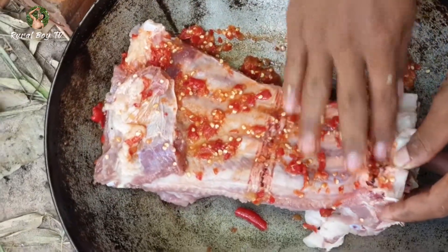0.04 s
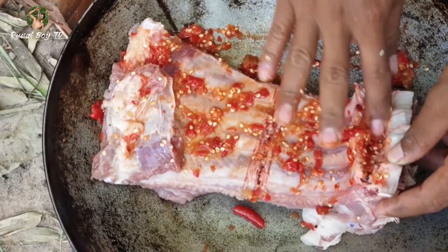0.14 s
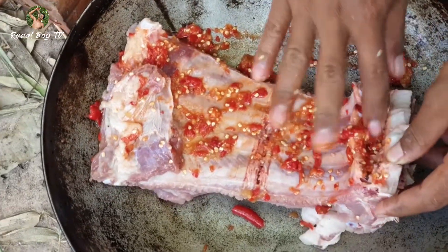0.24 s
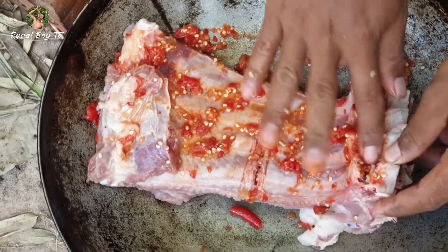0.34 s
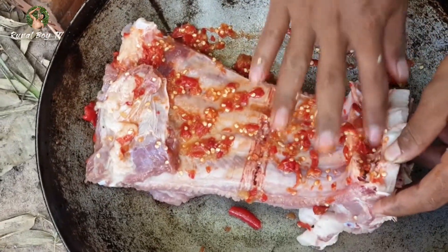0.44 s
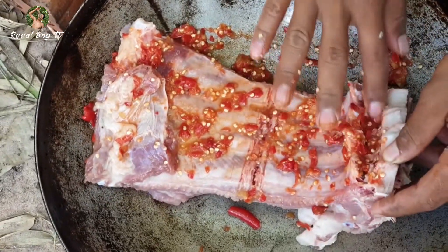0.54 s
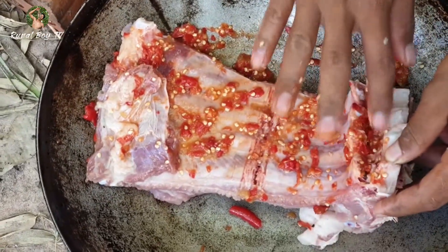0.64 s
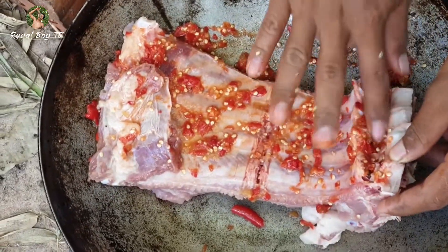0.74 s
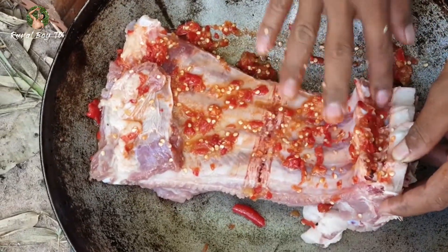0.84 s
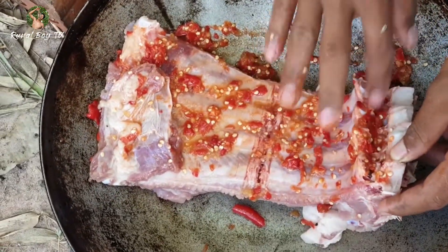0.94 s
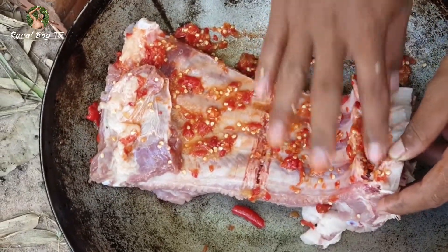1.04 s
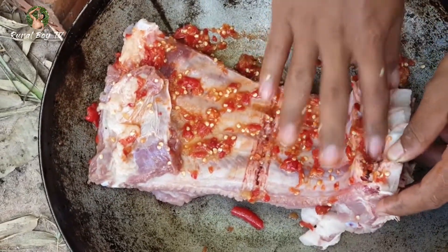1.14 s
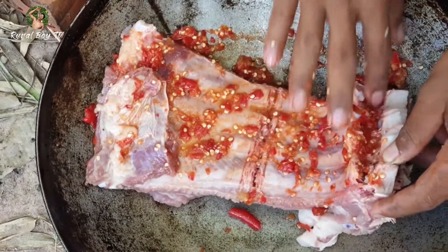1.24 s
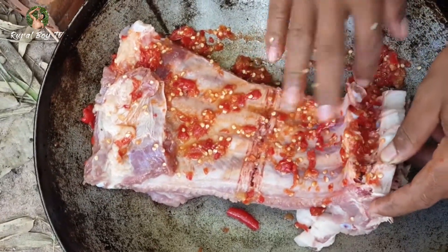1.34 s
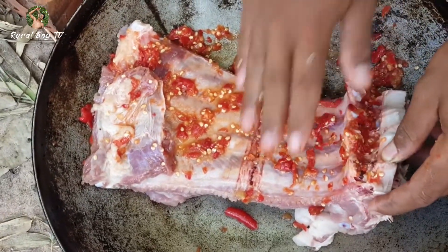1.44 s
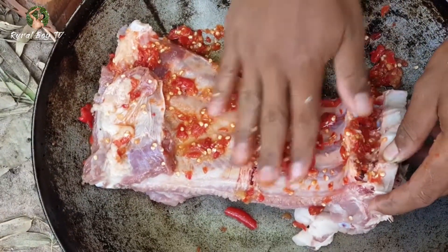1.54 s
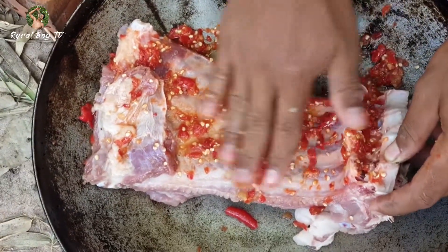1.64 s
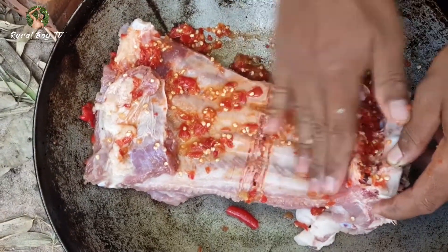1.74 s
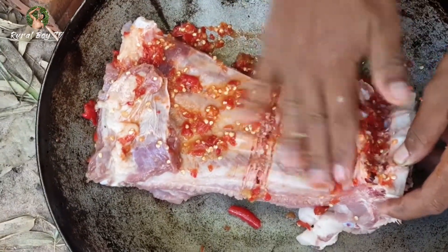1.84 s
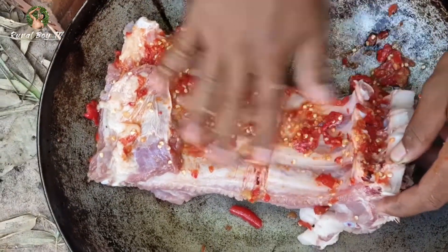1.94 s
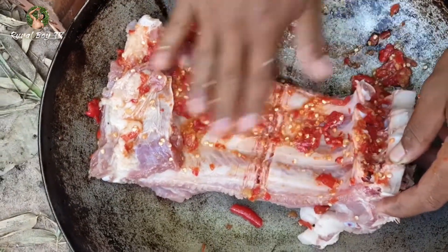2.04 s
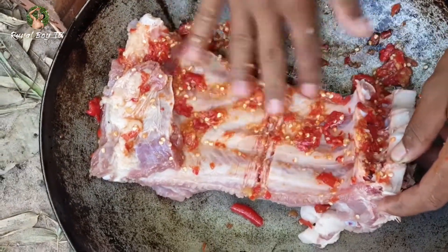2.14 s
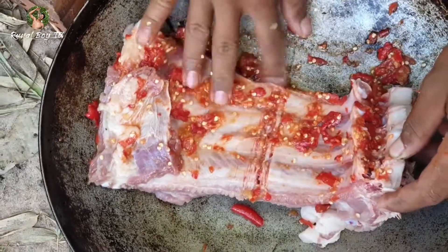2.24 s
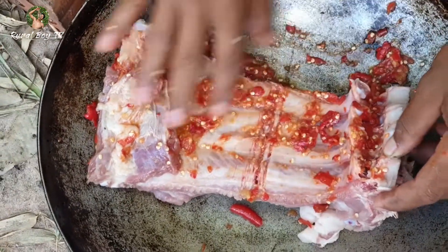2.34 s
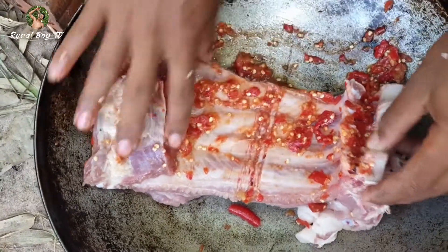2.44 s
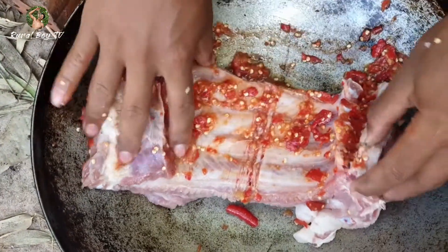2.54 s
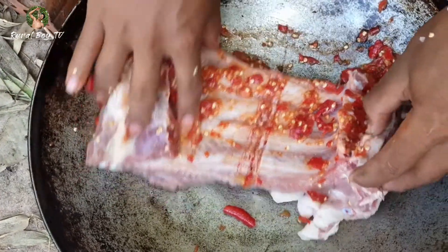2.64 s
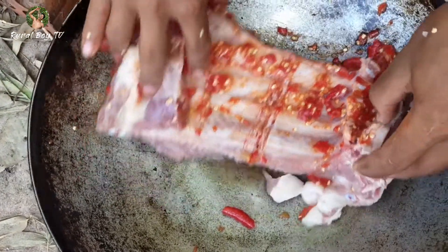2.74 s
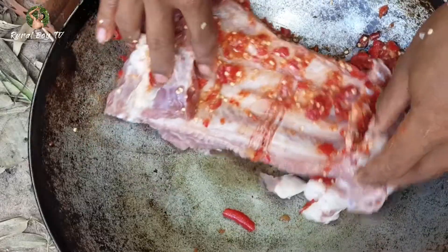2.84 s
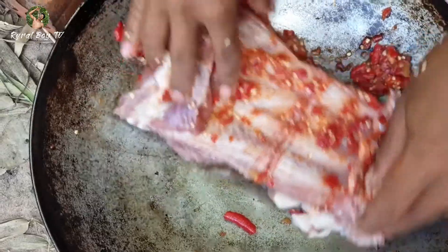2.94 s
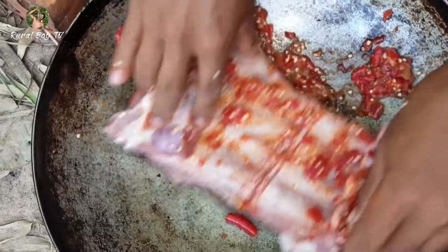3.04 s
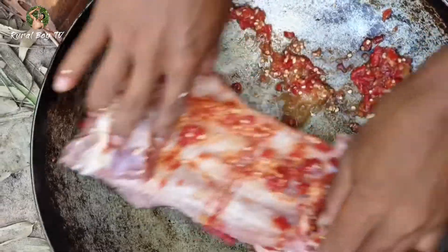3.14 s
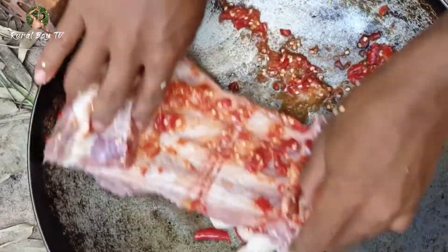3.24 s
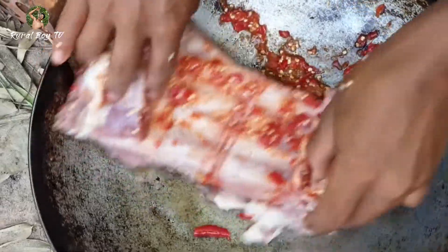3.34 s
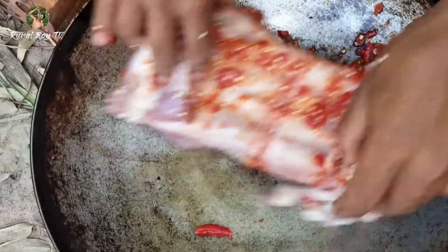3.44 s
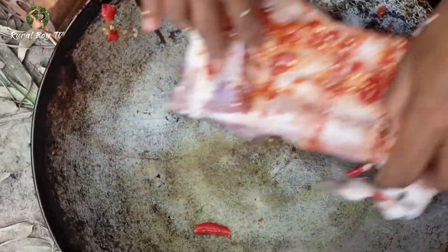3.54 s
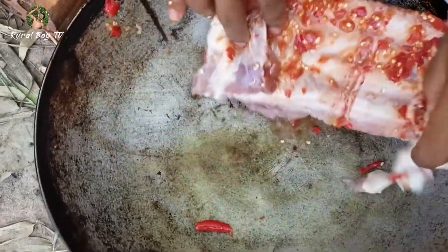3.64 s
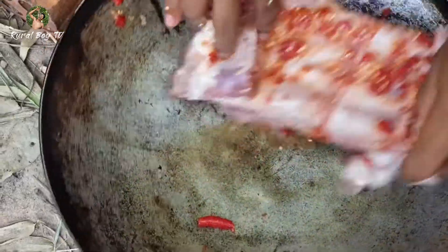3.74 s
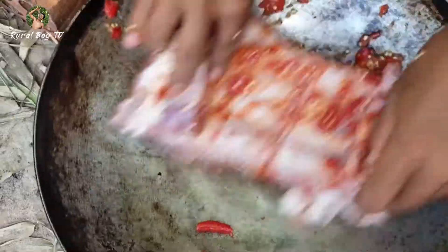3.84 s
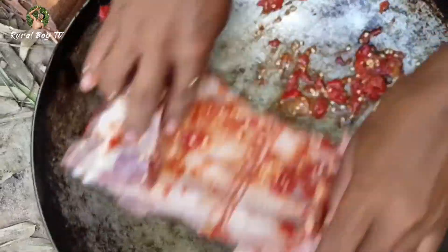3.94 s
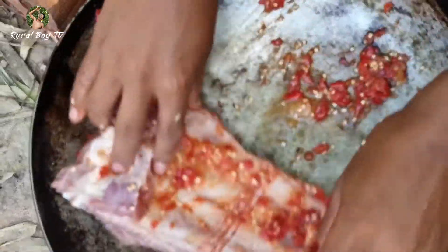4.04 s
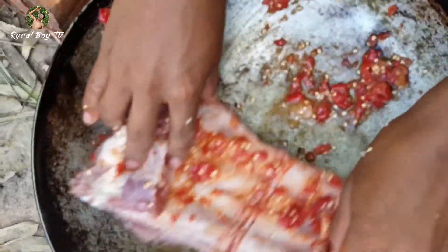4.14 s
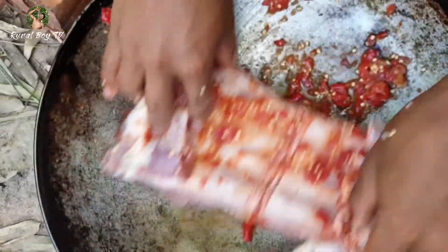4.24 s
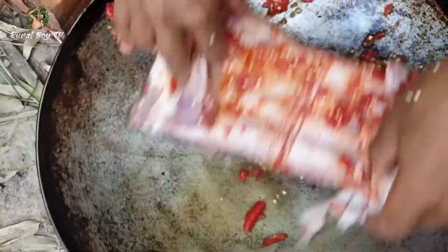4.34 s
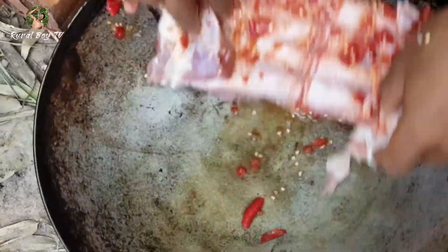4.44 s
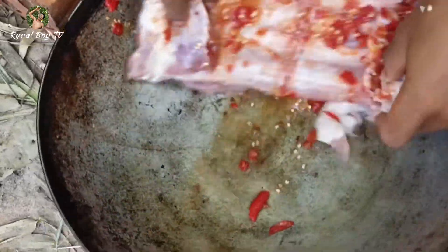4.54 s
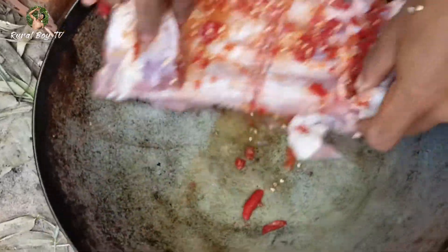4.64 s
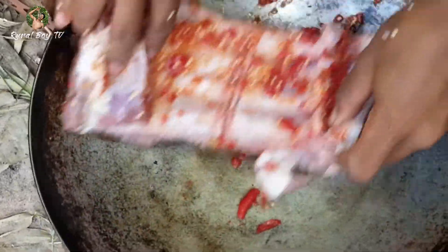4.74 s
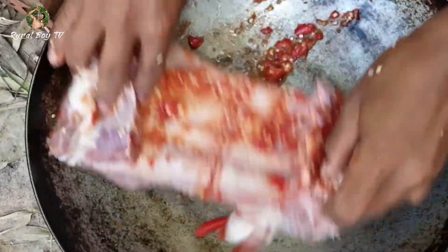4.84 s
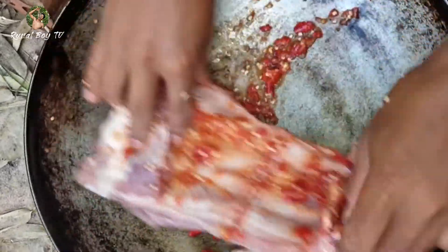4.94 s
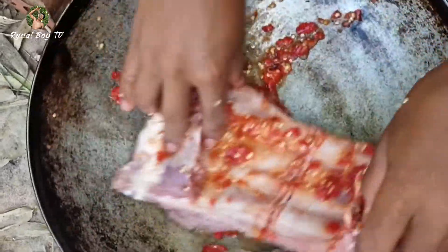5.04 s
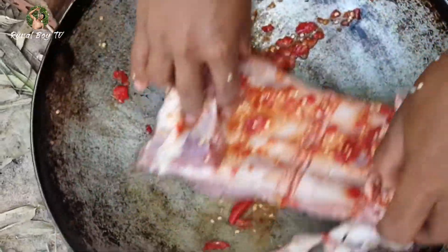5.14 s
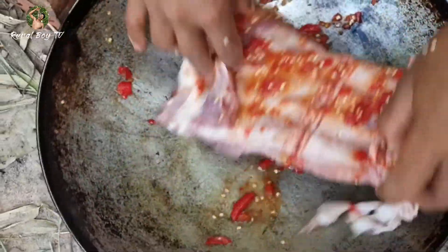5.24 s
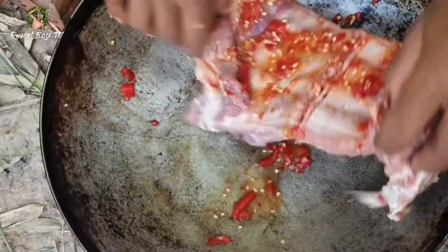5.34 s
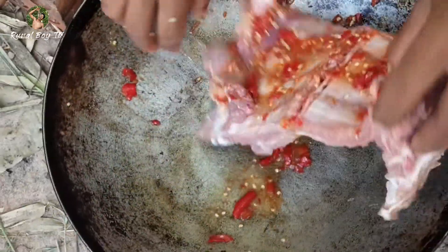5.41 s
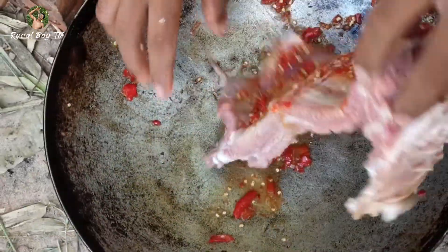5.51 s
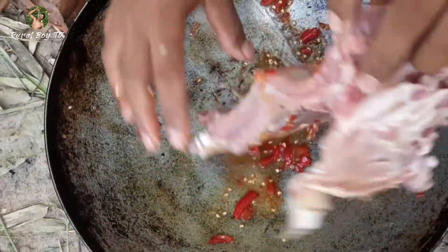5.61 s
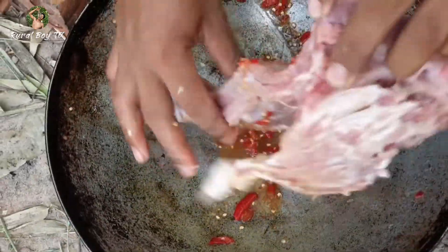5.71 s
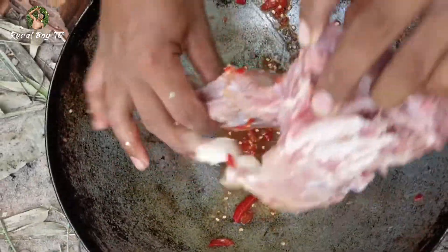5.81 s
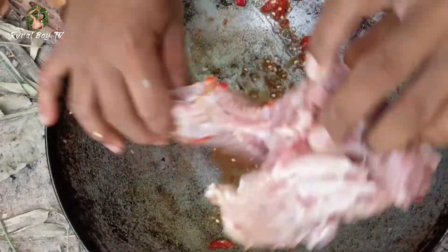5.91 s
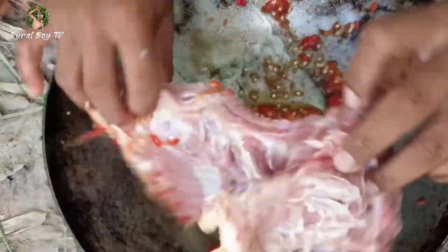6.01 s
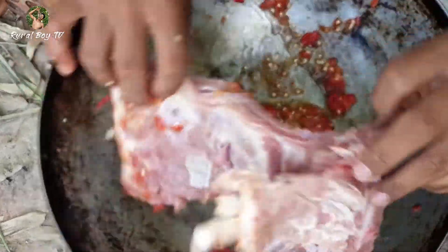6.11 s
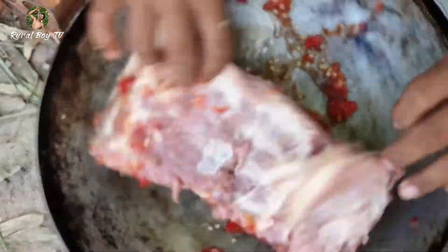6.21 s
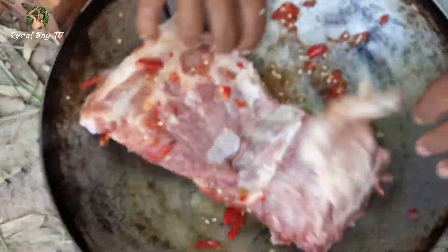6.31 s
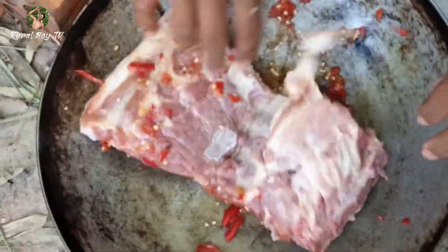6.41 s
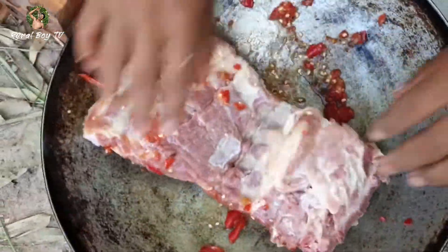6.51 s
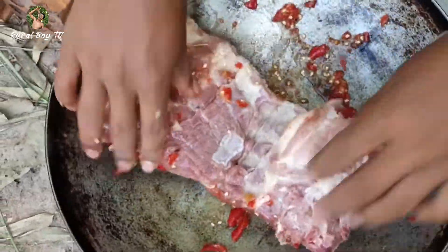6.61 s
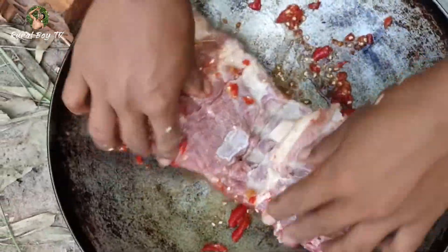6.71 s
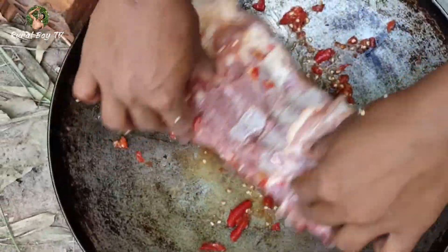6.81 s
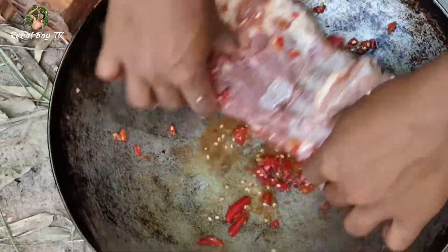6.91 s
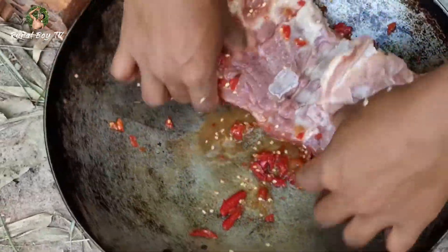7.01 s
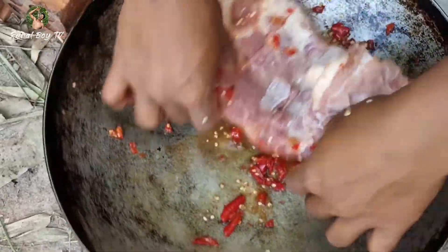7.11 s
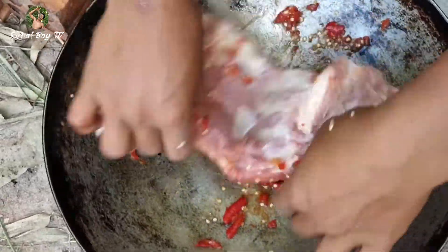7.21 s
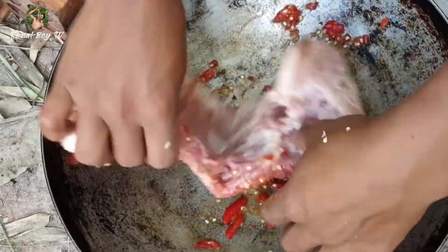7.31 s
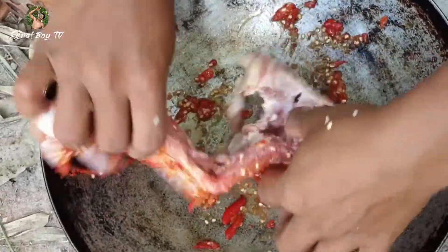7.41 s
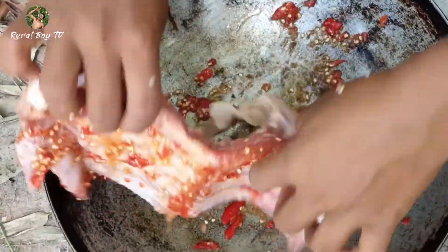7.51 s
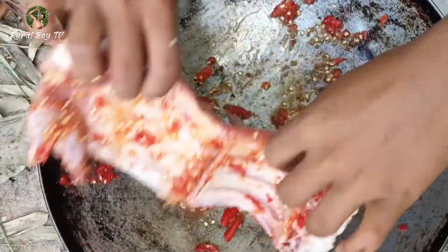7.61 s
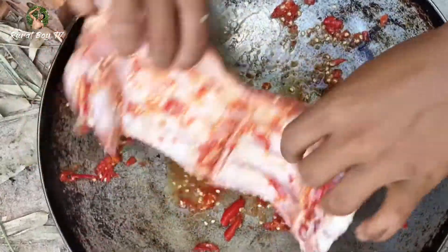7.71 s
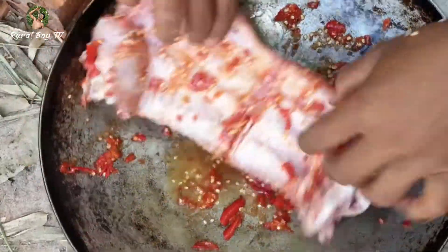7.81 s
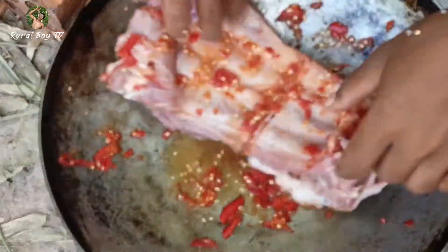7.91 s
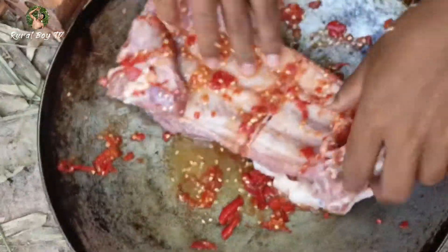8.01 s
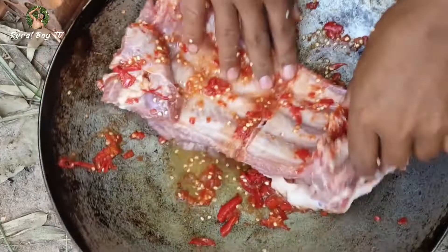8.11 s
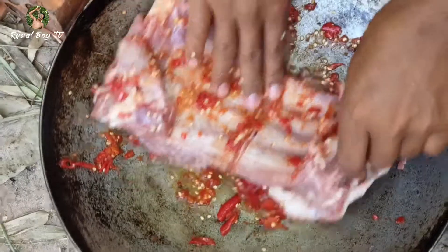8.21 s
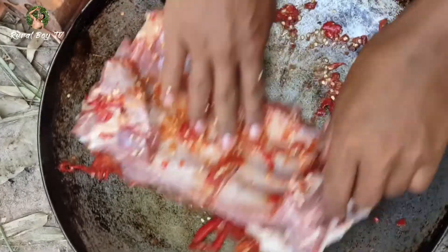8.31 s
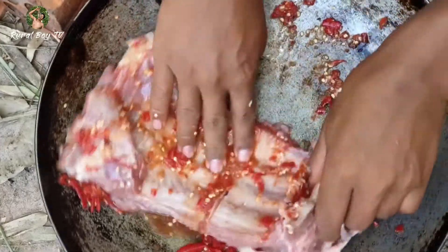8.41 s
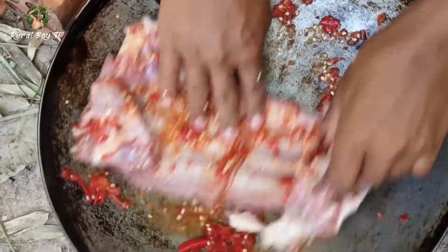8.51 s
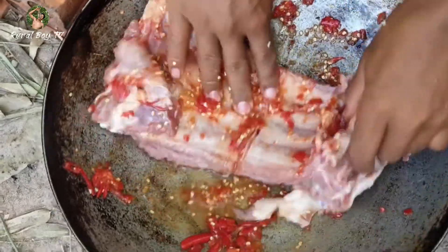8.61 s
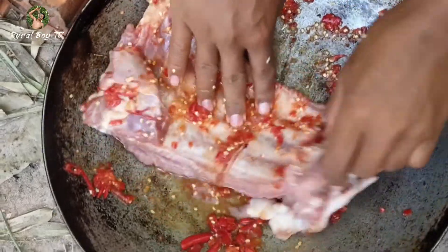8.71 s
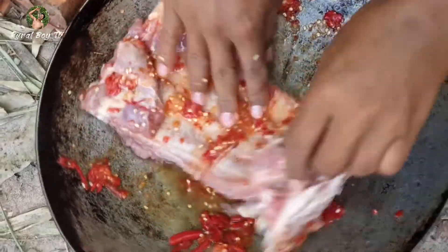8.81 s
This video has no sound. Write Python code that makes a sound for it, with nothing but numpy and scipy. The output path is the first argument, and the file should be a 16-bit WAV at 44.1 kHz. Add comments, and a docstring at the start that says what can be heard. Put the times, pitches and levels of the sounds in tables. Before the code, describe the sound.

A near stereo microphone catches quiet, sticky finger rubbing on raw ribs, then longer hissing wipes against a metal pan, with dull damped knocks. A small bird's quick up-and-down whistle recurs through the first half and leaves a short, airy echo. The rubbing nearly stops, then the meat lands in a cluster of hard knocks, a low thud and wet smacks, and grating slides continue over soft outdoor rumble.

```python
"""Hands rub wet marinade into a slab of raw ribs outdoors, then wipe the slab round a metal pan and turn it over.
The wet film is many tiny ringing grains and noise that crackle and hiss; skin parts in short bursts of spray.
Short gliding bands of noise colour the rubbing, and bone ends are damped knocks that ring the pan.
A bird repeats one arched whistle over a low, uneven rumble and faint far air, both of filtered noise."""
import sys
import numpy as np
from scipy import signal
from scipy.fft import rfft, irfft, next_fast_len
from scipy.io import wavfile
from scipy.ndimage import map_coordinates

SR = 44100
rng = np.random.default_rng(int(sys.argv[2]) if len(sys.argv) > 2 else 0)


def int16_out(signal):
    """Quantize to a 16-bit WAV file."""
    q = np.round(np.clip(np.atleast_2d(signal).T, -1, 1) * 32767)
    wavfile.write(sys.argv[1], SR, q.astype(np.int16))


N = 390726
TIME = np.arange(N) / SR

# How alike left and right are in the sounds at the pan and in the rumble.
# Each row: frequency in Hz, likeness (1 is the same, 0 is unrelated).
LIKENESS = [(60, 0.79), (130, 0.94), (290, 0.57), (640, 0.83), (1410, 0.79), (3100, 0), (15000, 0)]
# Fingers stroking the slab. Each row: moment of full speed in seconds, rise and fall in seconds, hiss level in dB.
FINGER_RUBS = [(0.0, 0.012, -52.5), (.1, .04, -59), (0.271, 0.024, -56.5), (.49, 0.052, -51),
               (.6, 0.14, -67), (.72, 0.15, -55.5), (.88, 0.082, -56), (1.02, 0.068, -64),
               (1.229, 0.098, -56), (1.61, 0.017, -50.5), (1.75, 0.033, -51.5), (1.94, 0.079, -52),
               (2.13, .06, -58.5), (2.28, 0.059, -52.5), (2.528, 0.035, -46.5)]


def gain_of(db):
    """Decibels to amplitude."""
    return 10 ** (np.asarray(db) / 20)


def evened(x):
    """Scales to rms 1."""
    return x / np.sqrt(np.mean(x ** 2) + 1e-20)


def read(points, hz):
    """Reads a curve of (Hz, value) points on a log-frequency axis."""
    f, value = np.transpose(points)
    return np.interp(np.log(hz + 1), np.log(f + 1), value)


def add(mix, s, sound):
    """Adds a sound to both channels at time s."""
    part = mix[:, max(round(s * SR), 0):][:, :sound.shape[-1]]
    part += sound[..., :part.shape[1]]


def coloured(x, spectrum, likeness):
    """Gives two unrelated channels a spectrum and a left-right likeness, at rms 1."""
    size = next_fast_len(N)
    hz = np.fft.rfftfreq(size, 1 / SR)
    left, other = rfft(x, size)
    same = np.clip(read(likeness, hz), -1, 1)
    right = same * left + np.sqrt(1 - same ** 2) * other
    shaped = np.array([left, right]) * gain_of(read(spectrum, hz))
    return evened(irfft(shaped, size)[:, :N])


def waver(rate_hz):
    """Random drift in straight lines between chance values, at rms 1."""
    knots = np.arange(0, N / SR + 1, 1 / rate_hz)
    return evened(np.interp(TIME, knots, rng.standard_normal(len(knots))))


def grains(per_s, spread_db, low_hz, high_hz, cycles, count=24):
    """Tiny bursting films: each size rings with its own decay and reaches the two microphones with its own phase."""
    t, out = np.arange(600) / SR, np.zeros((2, N))
    for hz in np.geomspace(low_hz, high_hz, count):
        strength = gain_of(spread_db * np.minimum(rng.exponential(1, N), 4))
        clicks = (rng.random(N) < per_s / count / SR) * strength
        phase = rng.random((2, 1))  # in turns
        ring = np.exp(-t * hz / cycles) * np.sin(2 * np.pi * (hz * t + phase))
        out += signal.oaconvolve(clicks[None], ring * hz, axes=1)[:, :N]
    return evened(out)


def pan_ring(x):
    """The damped pan's answer to a push: each mode has its listed gain at resonance."""
    # Modes of the pan. Each row: frequency in Hz, gain in dB, time to fall by 60 dB in seconds.
    modes = [(399, 4, 0.079), (561, 9, 0.064), (840, -21, 0.16), (1168, 0, 0.056), (1420, -0.5, 0.047),
             (1872, 12, 0.037), (2247, 12.5, 0.077), (2660, 15, 0.016)]
    t = np.arange(SR // 5) / SR
    ring = np.zeros(len(t))
    for hz, db, t60 in modes:
        unit_gain = 2 * np.log(1000) / (t60 * SR)
        ring += gain_of(db - 60 * t / t60) * np.cos(2 * np.pi * hz * t) * unit_gain
    return signal.oaconvolve(x, ring[None], axes=1)[:, :N]


def echoes(x, t60, delay):
    """Sparse scattered returns that die away, different at each microphone."""
    t = np.arange(SR // 2) / SR
    hits = (rng.random((2, len(t))) < .05) * (t > delay)
    taps = rng.standard_normal((2, len(t))) * hits * gain_of(-60 * t / t60)
    return signal.oaconvolve(x, taps / np.linalg.norm(taps[0]), axes=1)[:, :N]


def hollows(x, depth_db, width_hz, last_s):
    """Gaps between hand, meat and pan open and close, so that bands of the sound swell and fade."""
    hz, t, z = signal.stft(x, SR, nperseg=512, noverlap=384)
    # bands grow wider with pitch
    at = np.meshgrid(np.log1p(hz / 2500) * 2500 / width_hz, t / last_s, indexing="ij")
    field = evened(map_coordinates(rng.standard_normal((128, 512)), at, order=3, mode="wrap"))
    depth = depth_db / (1 + hz[:, None] / 7000)  # shallower in the treble
    z = z * gain_of(depth * field - depth ** 2 / 10)
    return signal.istft(z, SR, nperseg=512, noverlap=384)[1][:, :N]


def outdoors():
    """A low rumble and faint far-off air: coloured noises under slow swells."""
    # Slow swells of the surroundings. Each row: time in seconds, rumble level in dB, far air level in dB.
    swells = [(0, -48, -59.5), (.85, -44.5, -64), (1.1, -47, -54.5), (1.5, -48.5, -59), (3, -47, -59),
              (5, -49.5, -61), (5.75, -46, -60.5), (7, -48, -60), (8.86, -47, -55)]
    # Spectrum of the rumble. Each row: frequency in Hz, relative level in dB per Hz.
    rumble_spectrum = [(20, -30), (31, -14), (41, -4), (55, -1), (74, 2), (100, -1), (135, -3.5),
                       (200, -10), (260, -18), (400, -22), (600, -74)]
    # Spectrum of the far air. Each row: frequency in Hz, relative level in dB per Hz.
    air_spectrum = [(150, -21), (300, -0.5), (420, 3.5), (650, -5.5), (850, -4.5), (1020, 0), (1210, 5.5),
                    (1370, 2), (1550, 3), (2200, -43), (4000, -69), (8000, -18.5), (16000, -10)]
    # Left-right likeness of the far air. Each row: frequency in Hz, likeness (negative is opposed).
    air_likeness = [(200, 1), (640, 0.05), (1410, -0.82), (3100, -0.12)]
    s, rumble_db, air_db = np.transpose(swells)
    rumble = coloured(rng.standard_normal((2, N)), rumble_spectrum, LIKENESS)
    air = coloured(rng.standard_normal((2, N)), air_spectrum, air_likeness)
    return gain_of(np.interp(TIME, s, rumble_db)) * rumble + gain_of(np.interp(TIME, s, air_db)) * air


def bird():
    """A pure whistle from the left arches up and slides down; its highest part echoes longest."""
    # The calls. Each row: start in seconds, level in dB.
    calls = [(0.28, -48.5), (0.873, -45.5), (1.471, -47.5), (2.134, -48.5), (2.764, -44), (3.413, -46),
             (4.088, -48.5)]
    # The shape of every call. Each row: seconds after its start, pitch in Hz, relative level in dB.
    arch = [(0, 3700, -22), (.011, 4600, -6), (.022, 5050, -6), (.035, 5130, -7), (.046, 4800, 0.5),
            (.062, 4230, -0.5), (.075, 3800, -9.5), (.098, 3100, -12.5), (.118, 2750, -30)]
    s, hz, db = np.transpose(arch)
    t, out = np.arange(0, s[-1], 1 / SR), np.zeros((2, N))
    for start, level_db in calls:
        pitch = np.interp(t, s, hz) * (1 + 0.00296 * rng.standard_normal())  # each call slightly off
        whistle = np.sin(2 * np.pi * np.cumsum(pitch) / SR)
        call = gain_of(level_db + np.interp(t, s, db)) * whistle
        add(out, start, call * signal.windows.tukey(len(t), .08))
    # the bounce off the ground beats with the gliding whistle
    out = out + .6 * np.roll(out, 105, axis=1)
    out = out * gain_of(2.5 * waver(rate_hz=250))  # flutter
    out[1] = np.roll(out[1], 11)  # later on the right, in samples
    high = signal.sosfilt(signal.butter(4, 4800, "high", fs=SR, output="sos"), out)
    near = echoes(out, t60=0.22, delay=0.0018)
    far = echoes(high, t60=0.58, delay=.02)
    return out + gain_of(-1.5) * near + gain_of(-0.5) * far


def flops():
    """The weight of the slab gives a low, soft thud with a short slap of flesh on top."""
    # The slab flops down. Each row: start in seconds, level in dB, pitch in Hz, decay in seconds.
    drops = [(6.333, -16.5, 102, 0.0058)]
    t, out = np.arange(SR // 5) / SR, np.zeros((2, N))
    for s, db, hz, decay in drops:
        thud = (1 - np.exp(-t / 0.002)) * np.exp(-t / decay) * np.sin(2 * np.pi * hz * t)
        slap = gain_of(-10) * np.exp(-t / 0.0045) * np.sin(2 * np.pi * 260 * t)
        add(out, s, -gain_of(db) * (thud + slap))
    return out


def knocks():
    """A flesh-padded blow swells and dies in a few cycles over a dull push; bare bone adds a higher clack."""
    # Bone and knuckles on the pan. Each row: start in seconds, level in dB, pitch in Hz,
    # relative contact length (short ones are held at 0.2), clack in dB against the knock.
    blows = [(2.553, -45.5, 440, 0.4, -2), (3.003, -41, 1005, 1, -9), (3.185, -40, 1060, 0.9, -9),
             (3.648, -40, 1880, 0.47, 0), (3.737, -38, 547, .67, -8), (3.825, -33, 1920, 1, -19),
             (3.999, -32.5, 2270, 0.65, -0.5), (4.858, -18, 3000, 0.85, -16.5), (4.956, -42, 550, 0.54, -4),
             (5.197, -37, 650, .37, -17), (6.221, -18, 533, 0.45, -26), (6.261, -11, 506, 0.4, -7.5),
             (6.488, -13, 646, 0.33, -17.5), (7.065, -30, 1660, .5, -4), (7.082, -28.5, 1610, 0.43, -23),
             (7.472, -31.5, 1470, 0.26, -27), (7.888, -24.5, 780, 0.32, -29), (7.924, -33.5, 2480, 0.2, 0),
             (8.132, -15.5, 830, 0.37, -33), (8.265, -33.5, 1130, .7, -20), (8.315, -24, 1170, 1, -25),
             (8.435, -27, 1160, 0.32, -9), (8.722, -28, 1970, 0.34, -18), (8.743, -30, 2320, 0.86, 0)]
    t, out = np.arange(SR // 20) / SR, np.zeros((2, N))
    for s, db, hz, contact, clack_db in blows:
        peak_s = max(contact, .2) * (2.2 / hz + .0007)
        u = (t / peak_s) ** 1.4
        swell = u * np.exp(1 - u)
        clack = gain_of(clack_db) * (np.sin(2 * np.pi * 1100 * t) + np.sin(2 * np.pi * 1420 * t))
        lag = np.array([[0], [hz / 4500]])  # higher blows reach the two microphones further out of step
        knock = np.sin(2 * np.pi * hz * t + np.pi * lag)
        push = gain_of(-9.5) * np.exp(-t * hz / 2.05) * np.sin(2 * np.pi * 0.49 * hz * t)
        add(out, s, gain_of(db) * (swell * (clack - knock) - push))
    return out + gain_of(-6.0) * pan_ring(out)


def finger_level():
    """Amplitude of the hiss under the stroking fingers: the strokes add as powers."""
    return np.sqrt(sum((gain_of(db) * stroke(s, width, width)) ** 2 for s, width, db in FINGER_RUBS))


def lesser_smacks():
    """Small smacks that fall by chance until the last rub, as strong as the finger stroke under them."""
    per_s, over_hiss_db, spread_db, middle_db = 20, 12.5, 2.5, -1.5
    chance, size, colour = rng.standard_normal((400, 3)).T
    times = np.cumsum(chance ** 2) / per_s
    hiss_db = 20 * np.log10(np.interp(times, TIME, finger_level()) + 1e-9)
    db = hiss_db + over_hiss_db + spread_db * np.clip(size, -2, 2)
    rows = zip(times, db, middle_db + spread_db * colour)
    return [row for row in rows if row[0] < FINGER_RUBS[-1][0]]


def smacks():
    """Each parting film is a burst of spray that rises at once and dies within a few milliseconds."""
    # Sticky smacks as wet skin lets go. Each row: start in seconds, level in dB,
    # middle band in dB against the top band.
    partings = [(.0568, -30.5, 1), (0.3985, -50, 16.5), (0.511, -46, 14.5), (.6649, -37, 3.5),
                (0.782, -34.5, -1.5), (.849, -35.5, 4), (.9034, -40, 6), (1.209, -36, -1),
                (1.5922, -30, -12), (1.855, -33.5, -23), (2.0663, -27.5, -21), (2.4703, -38, 9),
                (2.5813, -36.5, 12.5), (3.1982, -36, 13.5), (4.041, -35.5, 15.5), (4.857, -20.5, 9),
                (5.806, -38, -17), (6.2627, -20, 11.5), (6.3338, -15.5, -13), (6.3967, -27, -8),
                (6.533, -28.5, 3), (6.6565, -35.5, 3.5), (7.081, -26.5, 0), (7.819, -28, 0),
                (7.887, -25.5, 11.5), (8.314, -20.5, 1), (8.644, -23, -8), (8.7403, -23.5, -2)]
    t, out = np.arange(SR // 25) / SR, np.zeros((2, N))
    top = signal.butter(1, [4500, 13000], "band", fs=SR, output="sos")
    middle = signal.butter(2, [2300, 6000], "band", fs=SR, output="sos")
    envelope = (1 - np.exp(-t / .0006)) * np.exp(-t / .0026)  # rise and decay in seconds
    sprays = rng.standard_normal((160, 2, 2, len(t))) * envelope
    for (s, db, middle_db), spray in zip(partings + lesser_smacks(), sprays):
        burst = signal.sosfilt(top, spray[0]) + gain_of(middle_db) * signal.sosfilt(middle, spray[1])
        add(out, s, gain_of(db) * burst)
    return out


def gliding_bands():
    """Spurting noise through a narrow resonance whose pitch glides slightly down."""
    # Short coloured bands in the rubbing: squeezed marinade, or the pan humming under a slide.
    # Each row: start in seconds, length in seconds, middle pitch in Hz, level in dB.
    bands = [(0.03, .067, 3700, -52.5), (2.495, .061, 490, -52.5), (2.971, 0.09, 1000, -54.5),
             (3.228, 0.099, 1400, -51), (3.378, 0.071, 1810, -48.5), (3.741, 0.087, 3670, -40.5),
             (4.199, 0.13, 3730, -43.5), (4.255, .12, 1390, -48), (4.85, 0.048, 3040, -42),
             (5.189, 0.082, 1400, -49), (6.15, 0.071, 3820, -46.5), (6.283, 0.18, 1350, -48.5),
             (6.731, 0.243, 1150, -45.5), (7.044, 0.017, 5100, -40), (7.21, .098, 1200, -49.5),
             (7.292, 0.16, 690, -53.5), (7.38, 0.254, 500, -54), (7.477, 0.13, 3080, -44),
             (7.512, 0.092, 4030, -42.5), (7.59, 0.23, 1408, -59.5), (8.53, 0.13, 1760, -48.5),
             (8.627, 0.017, 2030, -41), (8.736, .02, 2430, -32)]
    glide = -0.053  # change of pitch over a band's length, as a share
    out = np.zeros((2, N))
    for s, length, hz, db in bands:
        n = int(length * SR)
        spurts = gain_of(6.8 * rng.standard_normal(SR)[np.arange(n) // 60])  # a new strength every 60 samples
        noise = rng.standard_normal((4, n)) * spurts
        # a double pole narrows the noise, which is then shifted up to the pitch
        pole = np.exp(-np.pi * (130 + 0.21 * hz) / SR)
        noise = signal.lfilter([1], np.poly([pole, pole]), noise[:2] + 1j * noise[2:])
        same = np.clip(read(LIKENESS, hz) + 0.093, 0, 1)
        noise[1] = same * noise[0] + np.sqrt(1 - same ** 2) * noise[1]
        pitch = hz * (1 + glide * np.linspace(-.5, .5, n))
        tone = (noise * np.exp(2j * np.pi * np.cumsum(pitch) / SR)).real
        add(out, s, gain_of(db) * evened(tone) * signal.windows.tukey(n, .7))
    return out


def stroke(s, rise, fall):
    """A hand gathers speed, peaks at time s and slows again: a bell from 0 to 1."""
    shape = 1.87  # 1 is pointed, 2 is round
    away = abs(np.where(TIME < s, (s - TIME) / rise, (TIME - s) / fall))
    return np.exp(-np.minimum(away, 8) ** shape)


def friction():
    """Levels in dB of hiss, squelch and drag: speed drives all three, weight adds drag and some squelch."""
    # The slab slides on the pan, lightly on its wet side, heavily once turned over.
    # Each row: moment of full speed in seconds, rise in seconds, fall in seconds,
    # hiss level in dB, drag in dB against the hiss.
    slides = [(2.78, .13, 0.057, -44.5, -10), (3.0, 0.17, 0.089, -49.5, -14),
              (3.2, 0.078, 0.13, -44, -10.5), (3.43, 0.12, 0.2, -44, -18.5),
              (3.63, 0.085, 0.033, -42.5, -50), (3.77, 0.094, 0.093, -44.5, -5.5),
              (3.87, 0.16, 0.18, -34.5, -18.5), (4.27, 0.12, 0.18, -39.5, -14.5),
              (4.43, .06, 0.097, -39, -21), (4.7, 0.19, 0.14, -40.5, -13), (4.93, 0.14, 0.16, -35.5, -16),
              (5.23, 0.17, 0.11, -40, -16), (5.44, 0.15, 0.24, -50.5, -23), (6.15, 0.21, 0.24, -47.5, -19),
              (6.3, 0.061, 0.11, -40.5, -6.5), (6.48, 0.074, 0.088, -49.5, -7.5),
              (6.89, .12, 0.085, -40, -4), (7.07, 0.025, 0.019, -46, 2), (7.22, 0.14, 0.18, -42.5, -7.5),
              (7.55, .15, 0.069, -42.5, -6), (7.73, 0.097, .12, -47.5, -8.5),
              (7.889, 0.014, 0.052, -40, -5.5), (8.16, 0.044, 0.023, -48, 1), (8.34, 0.15, 0.11, -42, -4.5),
              (8.57, 0.066, 0.051, -40.5, -14.5), (8.72, 0.24, 0.15, -42, -10)]
    # The meat shifts a little between strokes: faintest early in the finger rubbing,
    # and faint again just before it is turned over. Each row: time in seconds, drag level in dB.
    shifting = [(0, -63), (.7, -72), (1.42, -70), (1.8, -59), (3, -58.5), (5.3, -57), (5.75, -68),
                (6.1, -58.5), (8.86, -56.5)]
    # fingers press lightly: squelch and drag lie below the hiss
    power = (gain_of([[0], [-14.5], [-9.5]]) * finger_level()) ** 2
    # the hiss and squelch of shifting, against its drag
    power += gain_of(np.interp(TIME, *np.transpose(shifting)) + np.array([[-0.5], [-10.5], [0]])) ** 2
    for s, rise, fall, hiss_db, drag_db in slides:
        squelch_db = -0.5 + 0.51 * drag_db  # squelch follows drag by half, in dB against the hiss
        levels = gain_of(hiss_db + np.array([[0], [squelch_db], [drag_db]]))
        power += (levels * stroke(s, rise, fall)) ** 2
    return 10 * np.log10(power)


def sliding():
    """Slow rubbing gives separate crackles; a fast wipe merges them into a hiss and drags on the pan."""
    # Spectrum of the hiss. Each row: frequency in Hz, relative level in dB per Hz.
    hiss_spectrum = [(1500, -26), (2500, -12.5), (3100, -6), (4400, -4.5), (6000, -3), (7200, -2),
                     (8500, -8.5), (11000, -5), (13500, -9), (16000, -16)]
    # Spectrum of the squelch. Each row: frequency in Hz, relative level in dB per Hz.
    squelch_spectrum = [(900, -37), (1400, -6), (1900, -2.5), (2400, -1), (3100, -3), (4000, -4.5),
                        (6000, -12), (10000, -31)]
    # Spectrum of the drag. Each row: frequency in Hz, relative level in dB per Hz.
    drag_spectrum = [(150, -18), (250, 10.5), (400, -5), (570, -2), (740, -0.5), (950, 1), (1180, 2),
                     (1450, -2.5), (2000, -2.5), (3500, -23)]
    hiss_db, squelch_db, drag_db = friction()
    grip_db = 1.59 * waver(rate_hz=45)  # the meat sticks and slips

    sparse = np.clip(.25 - (hiss_db + 52.5) / 45, .05, .7)  # share of separate crackles
    crackle = grains(per_s=1600, spread_db=2.0, low_hz=2380, high_hz=16900, cycles=1.7)
    fizz = np.sqrt(sparse) * crackle + np.sqrt(1 - sparse) * rng.standard_normal((2, N))
    hiss = coloured(fizz, hiss_spectrum, LIKENESS) * gain_of(hiss_db)

    bubbles = grains(per_s=900, spread_db=-1.5, low_hz=1317, high_hz=4930, cycles=26.0)
    bubbles = bubbles + 2.3 * rng.standard_normal((2, N))
    squelch = coloured(bubbles, squelch_spectrum, LIKENESS) * gain_of(squelch_db)

    slips = grains(per_s=700, spread_db=2.5, low_hz=349.6, high_hz=1720, cycles=4.2)
    slips = slips + 1.95 * rng.standard_normal((2, N))
    drag = coloured(slips + 0.48 * pan_ring(slips), drag_spectrum, LIKENESS) * gain_of(drag_db)

    rubbed = (hiss + squelch + drag) * gain_of(grip_db)
    return hollows(rubbed, depth_db=3.0, width_hz=140, last_s=.07)


def scene():
    """The pan lies close, slightly to the left; its wall scatters the smacks and, more faintly, the knocks."""
    wet, blows = smacks(), knocks()
    wet = wet + gain_of(-11) * echoes(wet, t60=.14, delay=.002)
    blows = blows + gain_of(-19) * echoes(blows, t60=.2, delay=.004)
    near = sliding() + gliding_bands() + wet + blows + flops()
    return near * gain_of([[.4], [-.4]]) + bird() + outdoors()


def record(dry):
    """Drops the deepest rumble below 30 Hz and cuts the treble off steeply at 16050 Hz."""
    dry = signal.sosfilt(signal.butter(4, 30, "high", fs=SR, output="sos"), dry)
    lowpass = signal.firwin(511, 16050, window=("kaiser", 9), fs=SR)
    return signal.oaconvolve(dry, lowpass[None], "same")


dry = scene()
out = record(dry)
int16_out(out)
```